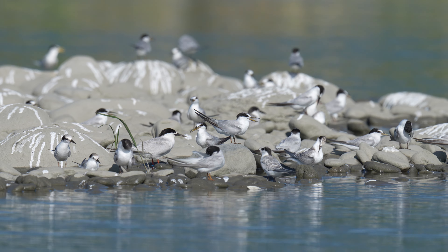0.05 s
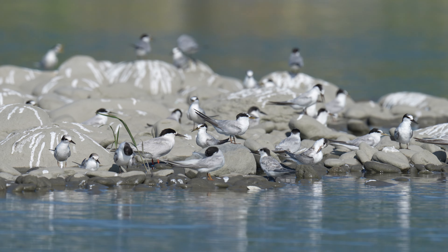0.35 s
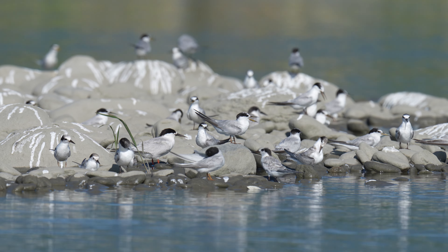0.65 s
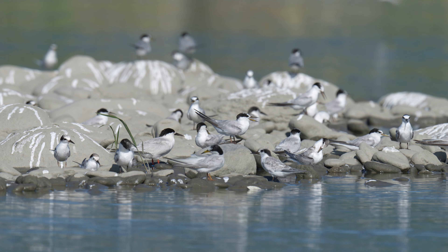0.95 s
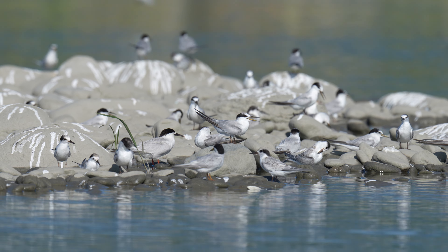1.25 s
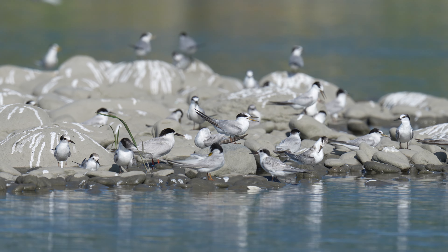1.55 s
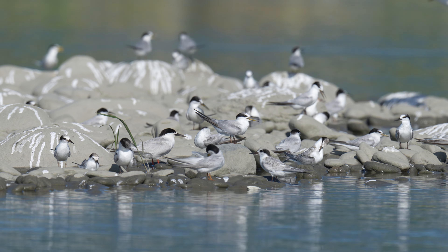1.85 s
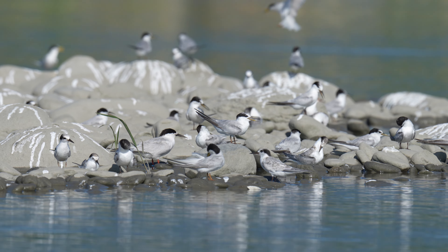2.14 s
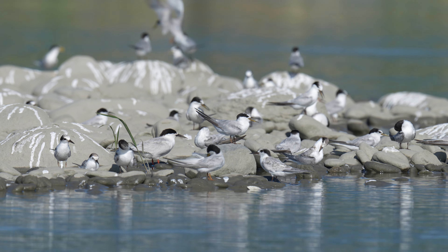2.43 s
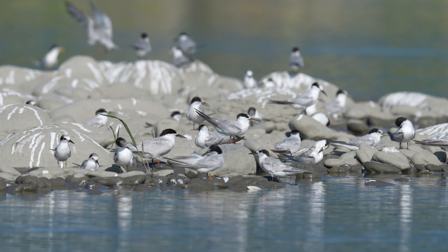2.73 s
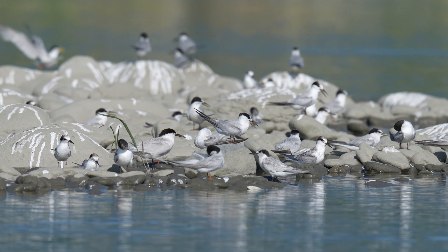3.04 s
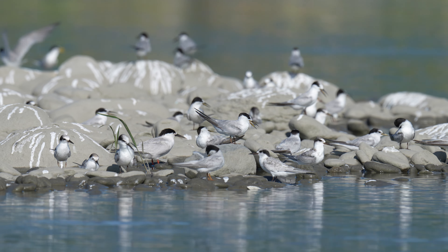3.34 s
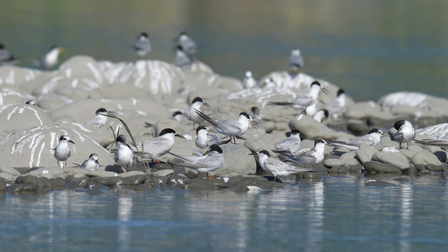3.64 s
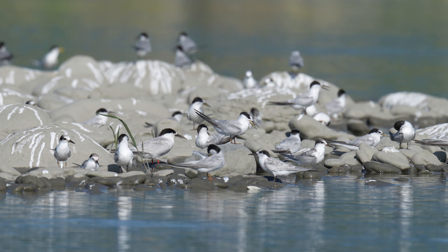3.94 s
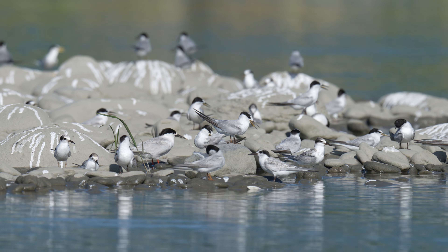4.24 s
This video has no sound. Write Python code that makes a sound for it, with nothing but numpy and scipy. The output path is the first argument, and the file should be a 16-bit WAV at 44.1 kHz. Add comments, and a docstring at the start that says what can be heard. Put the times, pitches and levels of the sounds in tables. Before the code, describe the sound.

Terns call from a rocky islet, heard in stereo with slight reflections and a faint hiss of open air. A harsh, yelping bark at 0.3 seconds is followed by a hoarse creak and a few clear whistles around 1 second. From 1.2 to 4.6 seconds, one bird near the centre repeats a high warbling rasp about three times a second, with gaps near the end. Louder barks cut in, mostly from the left, roughly once a second until 6 seconds, and once more near 8. Hoarse squawks come from both sides, mainly between 4.3 and 6.4 seconds. Thin peeps start around 3.3 seconds and take over from 6.5, quick at first, then softer and more spaced, picking up slightly around 9 seconds. Faint falling whistles come from distant birds. Underneath, a quiet, far-off rumble swells to a peak at 2.5 seconds and mostly fades by 6.

```python
"""Tern colony across calm water

A spaced pair of microphones faces a rocky islet. One bird repeats a warbling rasp, others answer with
harsh barks, squawks and clear whistles, and one takes over with a run of thin peeps. Each call is a
vibrating syrinx, coloured by throat and bill and hoarse where the vibration turns chaotic.
The rocks scatter the calls; a distant rumble swells and fades under them."""
import sys
import numpy as np
from scipy import signal
from scipy.fft import rfft, irfft
from scipy.io import wavfile
from scipy.ndimage import uniform_filter1d

SR = 44100
rng = np.random.default_rng(int(sys.argv[2]) if len(sys.argv) > 2 else 0)


def put_to_file(sound):
    """Save the sound as 16-bit audio at rate SR, in the file named by the first command-line argument."""
    columns = np.atleast_2d(sound).T  # one column per channel
    safe = np.clip(columns, -1, 1)
    whole_steps = np.round(safe * 32767)
    wavfile.write(sys.argv[1], SR, whole_steps.astype(np.int16))


N = 404397
TIME = np.arange(N) / SR
FREQS = np.maximum(np.fft.rfftfreq(N, 1 / SR), 1)
SCOOP_S, DROP_S = 0.014, 0.011   # hoarse lead-in and fall of a whistle or yelp
SLUR_S = 0.034   # dip that links two notes


def add_rasps(out):
    """One bird near centre: a fast warble, a steadier hold, then a hook up and down."""
    # long rasps: (start [s], end [s], warble [Hz], hook [Hz], level [dB])
    rasps = [(1.24, 1.419, 3623, 3576, -39.5), (1.504, 1.688, 4056, 4130, -42),
             (1.813, 2.02, 4230, 4180, -42), (2.141, 2.333, 4225, 4430, -41.5),
             (2.423, 2.608, 4610, 4460, -41), (2.69, 2.876, 3834, 3645, -41.5),
             (2.966, 3.151, 4335, 3720, -44), (3.247, 3.426, 4114, 4430, -45),
             (3.78, 3.951, 4460, 3670, -42), (4.036, 4.191, 4380, 4380, -43.5),
             (4.478, 4.628, 4100, 3910, -44.5)]
    # this bird's throat rings higher than the others: (frequency [Hz], gain [dB])
    high_throat = [(1700, -11), (2100, -10), (2700, -8), (3600, 6), (4500, 10), (5400, 5), (6200, -4),
                   (7500, -10.5), (8900, -7.5), (10300, -25.5), (12800, -10.5), (15500, -40)]
    hold_hz, warbles_per_s = 3626, 58
    for start, end, warble_hz, hook_hz, level_db in rasps:
        u = progress(start, end)
        turns_hz = [.6 * warble_hz, .98 * warble_hz, .96 * warble_hz, hold_hz, hold_hz,
                    1.14 * hook_hz, 1.01 * hook_hz, .8 * hook_hz]
        pitch = glide(u, [0, .12, .46, .54, .7, .79, .9, 1], turns_hz)
        pitch *= 1 + .0139 * flutter(len(u), 22)   # no two rasps twist alike
        cycles = np.cumsum(warbles_per_s * (1 + .247 * flutter(len(u), 24.9))) / SR
        depth = glide(u, [0, .2, .42, .52], [.4, 1, .55, .03])
        warble = depth * (.7 * np.sin(2 * np.pi * cycles) + .55 * flutter(len(u), 110))
        rough = glide(u, [0, .15, .45, .56, .7, .78, .88, 1], [1.1, .8, .7, .28, .33, 1.25, .45, 1])
        db = level_db + glide(u, [0, .14, .42, .56, .7, .8, .92, 1], [-8, 0, 0, -4.5, -4.5, .5, .5, -10])
        # each push raises pitch and level together
        note = syrinx(pitch * (1 + .089 * warble) / 2, db + 1.9 * warble, rough, odd_db=1, top_db=3.5,
                      throat=high_throat, doubling=.24 * rough)
        place(out, start, note, pan_db=-1.3, lag_ms=-.025)


def add_barks(out):
    """A low creak jumps to a higher, rougher cry; most clear into a yelp, often in two voices."""
    # level [dB], yelp level [dB], pan [dB])
    barks = [(0.29, 0.09, 3744, 3660, -30.5, -35.5, 0.5), (1.208, 0.08, 3560, None, -37.5, None, 14),
             (2.018, 0.061, 4080, 4350, -33.5, -35.5, 4.5), (2.673, 0.058, 4470, 4400, -35, -33.5, 4.5),
             (3.495, 0.069, 4100, 4390, -31, -34, 4.5), (4.36, 0.061, 4140, 4350, -34.5, -41, -3.5),
             (5.168, 0.055, 3920, 4410, -37, -35, 2.5), (6.125, 0.047, 4200, 3670, -36, -47.5, 5),
             (7.874, 0.056, 4050, 4430, -39, -41.5, 1)]
    creak_hz, yelp_hz, yelp_s, lag_ms = 1502, 3750, .042, -.125
    for start, length, cry_hz, top_hz, db, yelp_db, pan_db in barks:
        voice_break, end = start + .49 * length, start + length
        u = progress(start, voice_break + .0037)
        pitch = creak_hz * glide(u, [0, .45, 1], [.74, .96, 1.03])
        level = db + glide(u, [0, .45, 1], [-16.5, -4.5, -1.5])
        creak = syrinx(pitch, level, rough=.33, odd_db=0, top_db=-11)
        place(out, start, creak, pan_db, lag_ms)

        u = progress(voice_break, end - .004)
        pitch = cry_hz * glide(u, [0, .3, 1], [1.01, 1.025, .97])
        rough = glide(u, [0, .5, 1], [.8, .4, .8])
        cry = syrinx(pitch / 2, db, rough, odd_db=-1, top_db=-15, rise=.0014, fall=.002, doubling=.41)
        place(out, voice_break, cry, pan_db, lag_ms)
        if top_hz is None:
            continue
        swell_db = 11.5 - .0109 * (top_hz - yelp_hz)   # less swell the farther the voices split
        yelp = whistle(yelp_s, 3586, yelp_hz, 3676, yelp_db, swell_db, rough=.17)
        place(out, end - SCOOP_S, yelp, pan_db + 8, lag_ms)
        if top_hz > 1.1 * yelp_hz:
            pitch = top_hz * arc(progress(0, yelp_s), 1.02, 1.01, .94)
            upper_voice = syrinx(pitch / 2, yelp_db - 2.5, rough=.33, odd_db=-13, top_db=-9)
            place(out, end + .004, upper_voice, pan_db, lag_ms)
    # one hoarse creak on its own
    start, end = .461, .519
    u = progress(start, end)
    pitch = creak_hz * arc(u, .92, 1.03, .89)
    level = -32 + glide(u, [0, .2, .72, 1], [-14, -.5, -3, -8])
    grunt = syrinx(pitch, level, rough=1, odd_db=0, top_db=-14.5, doubling=.19)
    place(out, start, grunt, pan_db=4, lag_ms=lag_ms)


def add_whistles(out):
    """Clear notes that swell and bend in the middle, two of them linked by a slur."""
    # whistles: (start [s], end [s], pitch at the ends [Hz], middle pitch [Hz], level [dB], pan [dB])
    whistles = [(0.869, 0.957, 4055, 3944, -37.5, -1), (1.035, 1.097, 4060, 3990, -37.5, 1),
                (1.141, 1.156, 4050, 4200, -40.5, -2), (5.758, 5.788, 3780, 3620, -39.5, -3.5),
                (8.854, 8.933, 3810, 4224, -47, -8)]
    # the linking dip: (start [s], lowest pitch [Hz], level [dB])
    slurs = [(1.104, 5430, -48)]
    for start, end, edge_hz, middle_hz, db, pan_db in whistles:
        note = whistle(end - start, edge_hz, middle_hz, edge_hz, db, swell_db=4.5, rough=.12)
        place(out, start - SCOOP_S, note, pan_db, lag_ms=-.02)
    for start, hz, db in slurs:
        place(out, start, slur(hz, db), lag_ms=-.02)


def whistle(length, first_hz, middle_hz, last_hz, db, swell_db, rough):
    """The second harmonic sings almost alone, between a hoarse scoop and a quick drop."""
    t = np.arange(int((SCOOP_S + length + DROP_S) * SR)) / SR - SCOOP_S
    scoop = np.clip((.003 - t) / SCOOP_S, 0, 1)
    drop = np.clip((t - length) / DROP_S, 0, 1)
    pitch = glide(t / length, [0, .24, .42, .6, .88], [first_hz, first_hz, middle_hz, middle_hz, last_hz])
    pitch *= 1 - .27 * scoop - .21 * drop
    loose = np.minimum(3 * (scoop + drop), 1)   # the voice is weak and hoarse at both ends
    level = db + swell_db * glide(t / length, [.16, .52, .84], [0, 1, 0]) - 8 * loose
    return syrinx(pitch / 2, level, rough + .5 * loose, odd_db=-19 * (1 - loose), top_db=-7 + 5 * loose,
                  rise=.0031, fall=.0049)


def add_squawks(out):
    """Squawks from left and right, alone or with a shorter, clearer syllable close behind."""
    # squawks: (start [s], end [s], pitch [Hz], level [dB], roughness, pan [dB], second syllable or not)
    squawks = [(1.071, 1.098, 3930, -45, 1.2, -2, False), (3.623, 3.686, 4320, -47.5, 1.07, 0.5, False),
               (4.262, 4.362, 4040, -42.5, 0.86, -0.5, False),
               (4.709, 4.786, 3984, -42.5, 0.67, -1.5, True), (4.949, 5.034, 3935, -41.5, 0.71, -0.5, True),
               (5.291, 5.376, 4050, -38, 0.58, 10, False), (5.449, 5.54, 3857, -44, 0.69, -0.5, True),
               (5.785, 5.892, 3910, -40, 0.853, -1.5, True), (6.203, 6.272, 3793, -41.5, .9, -10, False),
               (6.266, 6.336, 3870, -39.5, 0.77, 8, False), (6.33, 6.425, 3980, -43.5, 1, -4.5, False),
               (8.85, 8.921, 4000, -48.5, 1.48, -5.5, False)]
    for start, end, hz, db, rough, pan_db, paired in squawks:
        lag_ms = .15 * abs(pan_db)   # the farther to one side, the greater the lag
        place(out, start, squawk(end - start, hz, db, rough), pan_db, lag_ms)
        if paired:
            place(out, end + .013, squawk(.06, hz, db - 1.5, rough=.42), pan_db, lag_ms)


def squawk(length, hz, level_db, rough):
    """One hoarse arch of pitch: it quavers at first, clears, and sweeps down to close."""
    # a squawking throat has more body: (frequency [Hz], gain [dB])
    full_throat = [(1000, -20), (1500, -16.5), (1950, -1), (2500, -24), (3100, 1.5), (4000, 9), (4700, 7.5),
                   (6000, -10.5), (8500, -10.5), (10300, -30), (12800, -16.5), (15500, -41)]
    quavers_per_s, growth_db = 62, 3.5
    u = progress(0, length)
    pitch = hz * glide(u, [0, .2, .8, 1], [.76, 1, 1, .72])
    strain = rough * glide(u, [0, .5, .75, 1], [1.05, .99, .4, 1.1])
    cycles = np.cumsum(quavers_per_s * (1 + .3 * flutter(len(u), 40))) / SR
    swing = signal.sawtooth(2 * np.pi * cycles, .7) + .5 * flutter(len(u), 120)
    quaver = 1 + strain * glide(u, [0, .45, .65, 1], [.11, .11, .025, .025]) * swing
    db = level_db + growth_db * (u - .5) + glide(u, [0, .22, .75, 1], [-6.5, 1, 1, -10])
    croak = .61 * strain * (1 + .5 * flutter(len(u), 56))
    return syrinx(pitch * quaver / 2, db, .79 * strain, odd_db=-4, top_db=-2.5, rise=.0011,
                  throat=full_throat, doubling=croak)


def add_peeps(out):
    """Peeps open with an upward flick; many slur into a falling note. They dull as the bird calms."""
    peeps = [(3.337, 0.06, 4540, -45, -48), (3.634, 0.074, 4430, -39, -45),
             (3.969, 0.067, 4360, -46.5, None), (4.817, 0.067, 4420, -44, -45),
             (5.21, 0.069, 4570, -45, -46.5), (5.586, 0.062, 4580, -42, -41),
             (6.031, 0.062, 4470, -44.5, -44.5), (6.369, 0.052, 4450, -40, -39.5),
             (6.605, .058, 4665, -37.5, -42), (6.785, 0.047, 4674, -36, None),
             (6.9, 0.051, 4530, -39, None), (7.016, 0.058, 4510, -40, None),
             (7.146, .059, 4450, -45.5, None), (7.274, 0.074, 4465, -43.5, -49),
             (7.478, 0.064, 4450, -42, None), (7.609, 0.064, 4360, -45.5, -49),
             (7.827, 0.039, 4450, -51.5, None), (8.088, 0.053, 4470, -49, -51),
             (8.313, .06, 4340, -45, -44), (8.545, 0.058, 4354, -45.5, -44), (8.782, .06, 4350, -40.5, -44),
             (9.044, 0.062, 4330, -41.5, -35)]
    # the bird's excitement: (time [s], excitement [0-1])
    mood = [(5.7, 1), (6.8, 0.53), (7.6, 0.12)]
    # the second side of the syrinx joins some peeps with a higher tone: (start [s], level [dB])
    second_tones = [(6.812, -47.5), (7.17, -51), (7.628, -45), (7.851, -46.5), (8.107, -47.5),
                    (9.065, -56.5)]
    flick_s, second_tone_hz, lag_ms = .012, 5565, -.14
    for start, length, hz, db, second_db in peeps:
        excitement = np.interp(start, *np.transpose(mood))
        overtones_db = -20 + 24 * excitement
        arch = .96 + .08 * excitement
        u = progress(0, flick_s)
        flick = syrinx(hz * (.47 + .209 * u), db - 9 + 5 * u, rough=.16, odd_db=.57, top_db=-8,
                       rise=.001, fall=.004)
        first = peep(length, hz, (1, arch, .94), db, overtones_db)
        notes = [(start - flick_s, flick), (start - .002, first)]
        if second_db is not None:
            dip = slur(1.08 * hz, db - 7.5)
            second = peep(.032 + .024 * excitement, hz, (1.005, .98, .945), second_db, overtones_db)
            notes += [(start + length, dip), (start + length + SLUR_S, second)]
        for at, note in notes:
            place(out, at, note, lag_ms=lag_ms)
    for start, db in second_tones:
        u = progress(0, .034)
        pitch = second_tone_hz * (1.015 - .048 * u)
        tone = syrinx(pitch / 2, db + 9 - 6 * u, rough=.17, odd_db=-27, top_db=-28, rise=.0033)
        place(out, start, tone, lag_ms=lag_ms)


def peep(length, hz, pitch_ratios, db, overtones_db):
    """A thin, curving note that wavers as it fades."""
    fade_db, waver_db = 3, 2.5
    u = progress(0, length + .0062)
    level = db - fade_db * (u - .5) + waver_db * flutter(len(u), 45)
    pitch = hz * arc(u, *pitch_ratios)
    return syrinx(pitch / 2, level, rough=.25, odd_db=-13.5, top_db=overtones_db, rise=.0081, fall=.0053)


def slur(hz, db):
    """A hoarse U-shaped dip of pitch that leads from one note to the next."""
    bend = (2 * progress(0, SLUR_S) - .92) ** 2
    return syrinx(hz / 2 * (1 + .141 * bend), db + 4 * (bend - .5), rough=.53, odd_db=-.5, top_db=-7,
                  rise=.0079, fall=.00073)


def syrinx(fundamental, db, rough, odd_db, top_db, rise=.0042, fall=.0031, throat=None, doubling=0):
    """A harmonic voice shaped by the throat; chaotic vibration shakes its pitch and strength."""
    # usual throat and open bill, favouring most calls' second harmonic: (frequency [Hz], gain [dB])
    usual_throat = [(1000, -3), (1500, -10), (1950, -13), (2500, -12), (3100, 5), (4000, 9), (4700, 4),
                    (6000, -3), (8500, -11), (10300, -20), (12800, -20), (15500, -44)]
    size = len(fundamental)
    jitter = .018 * flutter(size, 900) + .034 * flutter(size, 200)
    fundamental = fundamental * (1 + rough * jitter + .0027 * flutter(size, 86))
    phase = 2 * np.pi * np.cumsum(fundamental) / SR
    voice, power = 0, 0
    for k in range(1, 11):
        hz = np.maximum(k * fundamental, 1)
        brightness_db = top_db * np.interp(hz, [4900, 7400, 9700, 12300], [0, 1, 1, 0])
        harmonic_db = at_hz(throat or usual_throat, hz) + odd_db * (k % 2) + brightness_db
        gain = from_db(harmonic_db) * (hz < SR * .4)
        voice += gain * np.sin(k * phase)
        power += gain ** 2 / 2
    voice /= np.sqrt(uniform_filter1d(power, size=300))
    tremor = .12 * flutter(size, 70)
    chaos = rough * .57 * flutter(size, 840)
    # strong and weak cycles put a croak between the harmonics
    alternation = 1 + np.clip(doubling, 0, 1) * np.sin(phase / 2)
    shake = rms_one(alternation * (1 + np.tanh(chaos + tremor)))
    t = np.arange(size) / SR
    gate = np.clip(t / rise, 0, 1) * np.clip((t[-1] - t) / fall, 0, 1)
    return voice * shake * gate * from_db(db)


def flutter(size, rate_hz):
    """Random wobble of spread 1, up to the given rate."""
    lowpass = signal.butter(2, rate_hz, fs=SR, output="sos")
    return rms_one(signal.sosfilt(lowpass, rng.standard_normal(size + 4000))[4000:])


def progress(start, end):
    """Runs from 0 to 1 over a note."""
    return np.linspace(0, 1, int(max(end - start, .005) * SR))


def glide(u, knots, values):
    """A control that moves through its knots with rounded corners."""
    return uniform_filter1d(np.interp(u, knots, values), size=160, mode="nearest")


def arc(u, first, middle, last):
    """A parabola through the early, middle and late value of a note."""
    return np.polyval(np.polyfit([1 / 8, 1 / 2, 7 / 8], [first, middle, last], 2), u)


def from_db(db):
    """Decibels to gain."""
    return 10 ** (np.asarray(db) / 20)


def rms_one(x):
    """Scale to unit power."""
    return x / np.sqrt(np.mean(x ** 2) + 1e-20)


def at_hz(points, hz):
    """Read a spectrum on a log-frequency axis."""
    knots_hz, values = np.transpose(points)
    return np.interp(np.log(hz), np.log(knots_hz), values)


def place(out, start, note, pan_db=0, lag_ms=0):
    """Set a note between the spaced microphones; pan and lag are left minus right."""
    gains = rms_one(from_db([pan_db / 2, -pan_db / 2]))
    for side, gain, delay in zip(out, gains, [lag_ms / 2000, -lag_ms / 2000]):
        at = max(round((start + delay) * SR), 0)
        side[at:at + len(note)] += gain * note[:max(N - at, 0)]


def far_birds():
    """Dull falling whistles from the far side of the colony, more reflected than direct."""
    # distant whistles: (start [s], end [s], first pitch [Hz], level [dB])
    far_calls = [(0.618, 0.675, 4740, -65), (0.718, 0.76, 4760, -63.5), (1.72, 1.764, 4570, -64),
                 (4.546, 4.685, 3216, -62), (5.894, 6.09, 3204, -66.5), (6.395, 6.627, 3270, -67),
                 (7.98, 8.195, 3307, -67), (8.218, 8.293, 3370, -67), (8.556, 9.02, 3310, -68.5)]
    out = np.zeros((2, N))
    for start, end, hz, db in far_calls:
        pitch = hz * (1 - .21 * np.sqrt(end - start) * progress(start, end))   # longer ones fall farther
        level = db + 3 * flutter(len(pitch), 25)
        note = syrinx(pitch / 2, level, rough=.71, odd_db=-23, top_db=-32, rise=.0054, fall=.051)
        place(out, start, note)
    return from_db(-5) * out + from_db(-1) * scatter(out, t60=.25, delay=.003)


def near_echoes(calls):
    """A few early bounces reach each microphone at its own delay."""
    # bounces off water and rock: (left delay [ms], right delay [ms], gain [dB])
    bounces = [(1.296, 1.9, -15.5), (3.7, 2.9, -19), (6.102, 7.3, -10)]
    out = np.zeros((2, N))
    for *delays_ms, db in bounces:
        for side, ms in enumerate(delays_ms):
            out[side] += from_db(db) * np.interp(TIME - ms / 1000, TIME, calls[side], left=0)
    return out


def scatter(calls, t60, delay):
    """A dying cloud of reflections, different at each microphone."""
    t = np.arange(int(SR * .8)) / SR
    cloud = rng.standard_normal((2, len(t))) * from_db(-60 * t / t60) * (t > delay)
    cloud /= np.sqrt(np.sum(cloud ** 2, axis=1, keepdims=True))
    return signal.fftconvolve(calls.mean(axis=0)[None], cloud, axes=1)[:, :N]


def distant_rumble():
    """A far-off rumble that swells and fades in three registers."""
    # its swell: (time [s], body level [dB], upper level [dB])
    swell = [(0.0, -59, -57), (0.05, -60.5, -61), (1.5, -57.5, -58), (2.48, -49.5, -51),
             (4.39, -54.5, -57.5), (4.65, -60.5, -63.5), (6.13, -70.5, -64.5), (8.84, -65, -63),
             (9.17, -68.5, -66)]
    # its colour: (frequency [Hz], spectral level [dB])
    colour = [(15, -37), (25, -17), (49, -8.5), (71, -3.5), (114, -3.5), (173, -1.5), (255, -2.5),
              (400, -2.5), (510, -2), (624, -3), (751, -4), (1330, -12.5), (1400, -8), (1820, -15),
              (3080, -120)]
    times, *levels = np.transpose(swell)
    body_db, upper_db = (np.interp(TIME, times, level) for level in levels)
    deep_db = -61 + .54 * (body_db - body_db.mean())   # follows the body with a smaller swing
    out = np.zeros((2, N))
    for db, low_hz, high_hz in [(deep_db, 22, 125), (body_db, 120, 373), (upper_db, 400, 1330)]:
        band = 1 / np.sqrt((1 + (low_hz / FREQS) ** 10) * (1 + (FREQS / high_hz) ** 10))
        out += from_db(db) * ambient_noise(band * from_db(at_hz(colour, FREQS)))
    return out


def low_drone():
    """A steady hum of narrow noise bands."""
    # drone bands: (centre [Hz], half-width [Hz], level [dB])
    bands = [(63.5, 8, -67.5), (85.4, 16, -68.5), (569, 46, -71)]
    return sum(from_db(db) * ambient_noise(1 / (1 + ((FREQS - hz) / width) ** 2))
               for hz, width, db in bands)


def air_hiss():
    """The faint, steady hiss of open air."""
    # its colour: (frequency [Hz], spectral level [dB])
    colour = [(530, -42), (900, -6), (1080, -0.5), (1320, -8), (2370, -9.5), (2730, -7.5), (3190, -9),
              (3860, -13), (4240, -8), (5720, -15), (6000, -13.5), (9670, -18.5), (15600, -19.5)]
    return from_db(-60.5) * ambient_noise(from_db(at_hz(colour, FREQS)) * (FREQS > 400))


def ambient_noise(spectrum):
    """Coloured noise, alike at both microphones in the bass and diffuse in the treble."""
    # likeness across the pair: (frequency [Hz], correlation [0-1])
    likeness = [(60, .9999), (120, 0.97), (250, 0.97), (500, 0.8), (1000, 0.26), (2500, 0), (8000, 0.15)]
    alike = at_hz(likeness, FREQS)
    mid, side = rfft(rng.standard_normal((2, N)))
    pair = np.sqrt(1 + alike) * mid + np.sqrt(1 - alike) * side * [[1], [-1]]
    return rms_one(irfft(spectrum * pair, N))


def scene():
    """Calls, their reflections from near rocks and the far shore, and the background."""
    calls = np.zeros((2, N))
    add_barks(calls)
    add_whistles(calls)
    add_rasps(calls)
    add_squawks(calls)
    add_peeps(calls)
    calls += far_birds()
    rocks = from_db(-12) * scatter(calls, t60=.025, delay=.0005)
    shore = from_db(-25) * scatter(calls, t60=.55, delay=.015)
    background = air_hiss() + distant_rumble() + low_drone()
    return from_db(1.5) * calls + near_echoes(calls) + rocks + shore + background


def record(dry):
    """The highest treble is cut steeply on both channels."""
    cutoff_hz = 15600
    return irfft(rfft(dry) / np.sqrt(1 + (FREQS / cutoff_hz) ** 200), N)


dry = scene()
out = record(dry)
put_to_file(out)
```